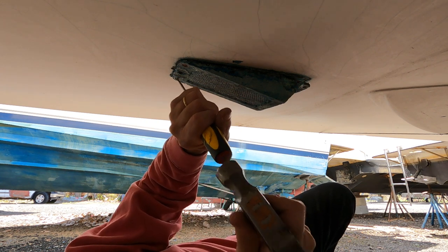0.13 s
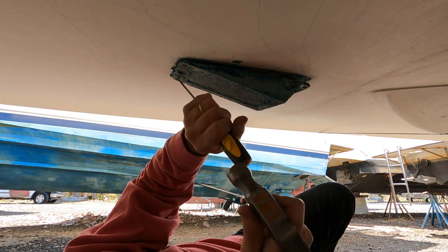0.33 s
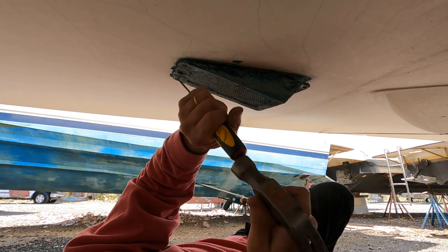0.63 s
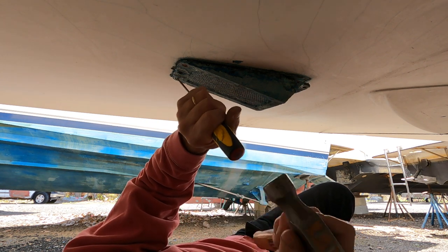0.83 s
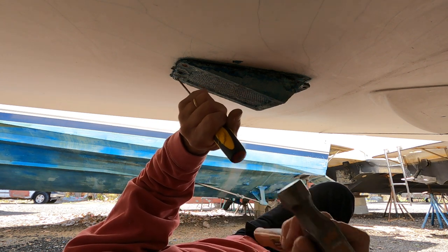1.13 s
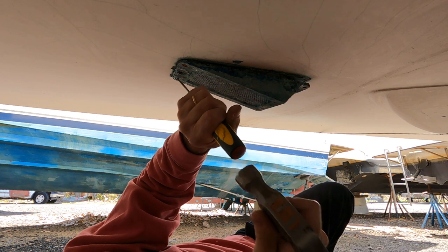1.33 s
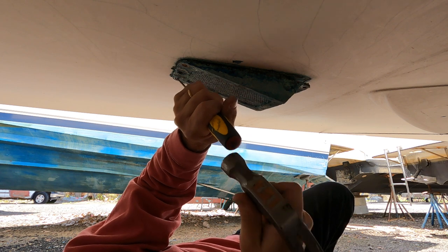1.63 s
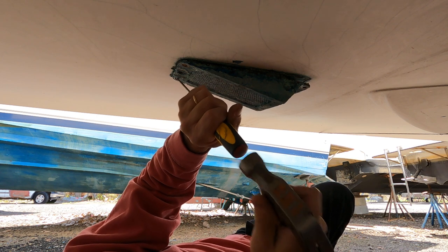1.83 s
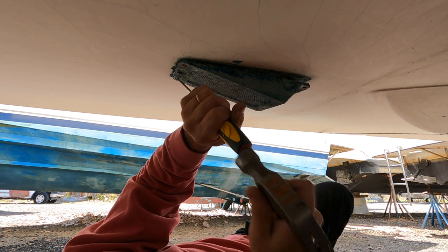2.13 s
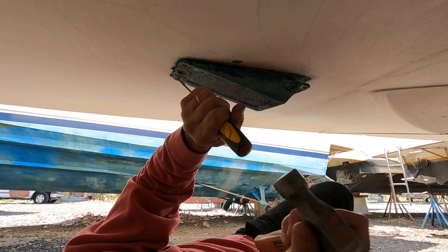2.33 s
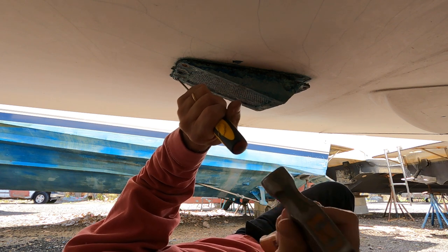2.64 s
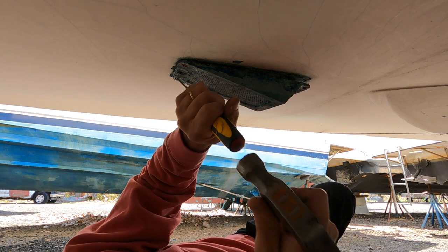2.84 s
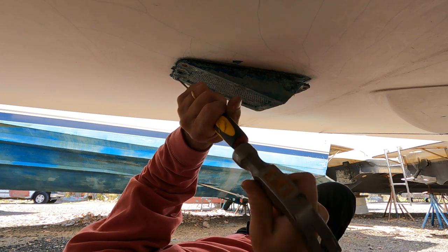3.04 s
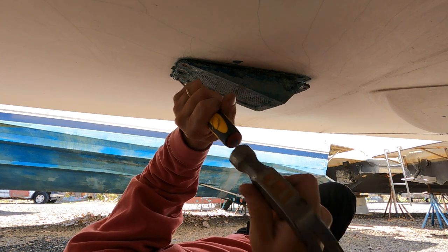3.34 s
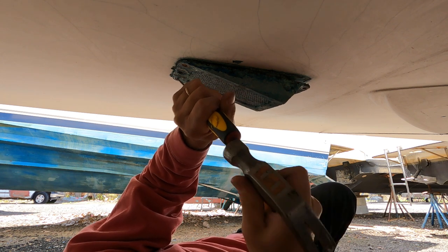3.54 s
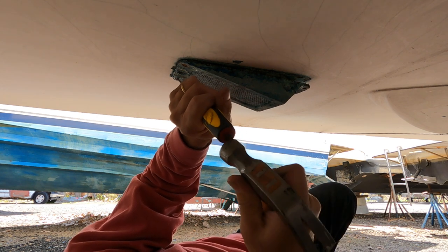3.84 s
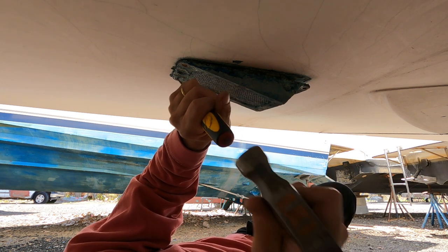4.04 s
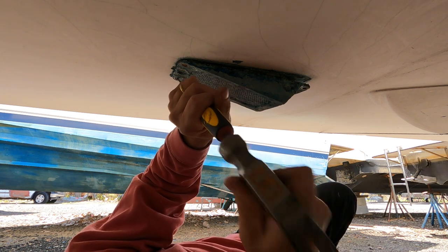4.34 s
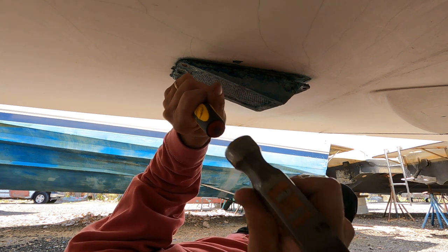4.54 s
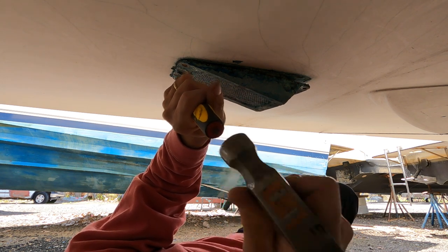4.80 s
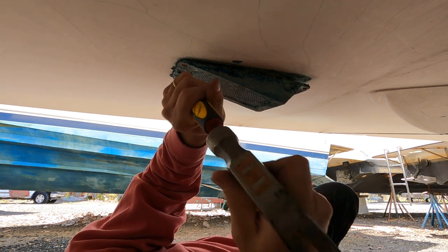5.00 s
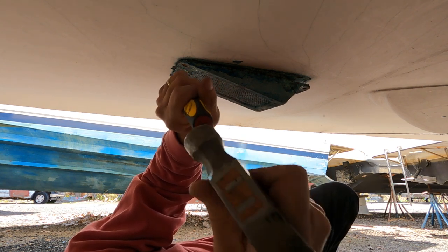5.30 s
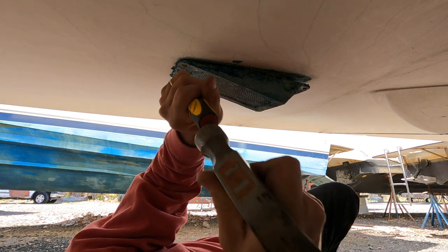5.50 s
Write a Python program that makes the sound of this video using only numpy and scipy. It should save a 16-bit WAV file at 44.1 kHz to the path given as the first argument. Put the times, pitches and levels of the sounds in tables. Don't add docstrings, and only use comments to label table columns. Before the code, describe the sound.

Close, even hammer taps on a tool handle, sharp and woody, resonating through hollow hull panels in a quiet outdoor yard.

```python
import sys
import numpy as np
from scipy import signal
from scipy.fft import rfft, irfft
from scipy.io import wavfile

SR = 44100
rng = np.random.default_rng(int(sys.argv[2]) if len(sys.argv) > 2 else 0)


def invert_db(x):
    u = np.asarray(x, float) / 20
    return 10 ** u


def wav_record(signal):
    frames = np.transpose(np.atleast_2d(signal))
    bounded = np.clip(frames, -1, 1)
    quanta = np.round(bounded * 32767).astype(np.int16)
    wavfile.write(sys.argv[1], SR, quanta)


N = 249779
LEAD = SR // 5
HULL_LAG_S = 0.00063

# (time [s], sharpness [dB], lower shaft ring [dB], upper shaft ring [dB], head beat null after blow [s])
BLOWS = [(-0.1342, -11, -74, -68.2, 0.11), (0.1547, -6, -69.5, -69.5, .01), (0.4361, -1.5, -83, -62, .004),
         (0.7443, -6.5, -64, -79, 0.021), (1.0393, -3.5, -64.5, -68.5, .16),
         (1.3496, 0.5, -68.5, -65.5, .17), (1.6785, -0.5, -66, -73.5, 0.0043), (1.9866, 0, -66, -62.5, 0.1),
         (2.279, 1.5, -61.5, -65, 0.11), (2.5723, 3, -72, -60.5, .115), (2.853, 1.3, -68, -69, 0.082),
         (3.119, 1.5, -79, -66, 0.075), (3.3874, 3, -71.5, -71.5, 0.081), (3.6594, 1.5, -79.5, -84, 0.093),
         (3.9455, 2, -69, -79, .12), (4.211, 3, -80, -74, 0.15), (4.4918, 3, -65.5, -70.5, .15),
         (4.755, 2.7, -66, -68, 0.15), (5.0155, 3.0, -62, -69, 0.14), (5.2785, 2.5, -59, -78, .18),
         (5.5225, 4, -60, -62, 0.18)]
# (frequency [Hz], level [dB], t60 [s], polarity [+-1], gain change per dB of sharpness [1/dB])
PANELS = [(56.0, -56.1, 0.409, 1, 0.01), (70.6, -66.8, 0.76, 1, 0.05), (114.6, -51.5, 0.845, 1, 0.01),
          (116.6, -44.3, 0.505, -1, 0.04), (123.7, -42.0, 0.352, -1, -0.01), (138.7, -28.2, 0.115, 1, 0.01),
          (147.2, -51.9, 0.845, -1, 0.01), (162.2, -54.0, 0.65, -1, 0.02), (171.4, -53.0, 0.492, -1, 0.07),
          (206.0, -43.9, 0.845, 1, 0.05), (206.2, -38.3, 0.599, -1, 0.04), (226.3, -32.8, 0.117, 1, 0.02),
          (234.5, -53.0, 0.494, -1, 0.02), (246.1, -50.1, 0.552, 1, 0.01), (263.3, -35.3, 0.228, 1, -0.01),
          (274.0, -50.4, 0.539, -1, 0.09), (282.3, -64.2, 0.827, -1, 0.17), (294.4, -15.5, 0.025, -1, -0.0),
          (302.2, -33.3, 0.192, -1, -0.0), (308.6, -35.0, 0.778, 1, -0.02),
          (308.7, -35.0, 0.845, -1, -0.02), (348.9, -25.4, 0.117, 1, 0.04), (376.4, -40.4, 0.259, 1, 0.02)]
# (frequency [Hz], level [dB], t60 [s], polarity [+-1], gain change per dB of sharpness [1/dB])
RIBS = [(418.7, -53.1, 0.367, 1, -0.03), (426.3, -23.3, 0.025, 1, -0.0), (463.8, -44.5, 0.159, -1, -0.02),
        (479.7, -64.3, 0.576, -1, 0.07), (505.8, -29.9, 0.023, 1, 0.0), (513.7, -51.7, 0.236, -1, 0.03),
        (550.5, -43.5, 0.192, -1, -0.02), (558.7, -59.1, 0.405, -1, -0.01), (564.8, -39.1, 0.066, 1, -0.0),
        (599.3, -45.7, 0.166, -1, 0.09), (609.7, -53.2, 0.225, -1, 0.05), (621.3, -65.6, 0.347, -1, 0.18),
        (642.0, -46.2, 0.073, -1, 0.17), (670.8, -59.4, 0.116, -1, 0.12), (685.7, -57.4, 0.213, -1, 0.1),
        (792.3, -60.4, 0.224, -1, 0.09), (811.6, -50.1, 0.129, -1, 0.06), (863.7, -54.7, 0.084, 1, 0.21),
        (910.9, -66.2, 0.313, -1, -0.01)]
# (frequency [Hz], early level [dB], early t60 [s], late level [dB], late t60 [s])
TAIL_BANDS = [(96, -57.5, 0.47, -69, 0.83), (133, -60, 0.23, -56, 0.94), (302.3, -50.5, 0.23, -57.5, 1),
              (370, -59, 0.14, -49, 0.45), (545, -63.5, 0.022, -62.5, .6), (647, -49.5, 0.033, -63.5, 0.6),
              (756, -42, 0.046, -65, 0.5), (970, -43, 0.045, -64, 0.11), (1096, -54, 0.033, -67, 0.42),
              (1698, -39, 0.027, -64, 0.35), (2400, -44.5, 0.041, -69.5, 0.49),
              (2730, -53, 0.038, -68, 0.3), (3600, -55, 0.032, -84, 0.36), (5300, -60, 0.022, -78, 0.3),
              (6900, -69, .014, -84, .16), (9500, -68.5, .008, -104, .06),
              (13770, -67.5, .003, -120, 0.046)]


def butter(order, hz, kind, x):
    return signal.sosfilt(signal.butter(order, hz, kind, fs=SR, output="sos"), x)


def highpass_zero_phase(x, hz, **padding):
    return signal.sosfiltfilt(signal.butter(2, hz, "high", fs=SR, output="sos"), x, **padding)


def band(x, hz, octaves, order=2):
    return butter(order, [hz * 2 ** (-octaves / 2), hz * 2 ** (octaves / 2)], "band", x)


def fade(t, t60):
    return (t >= 0) * np.exp(-np.log(1000) * np.maximum(t, 0) / t60)


def unit(x):
    return x / np.sqrt(np.mean(x ** 2))


def modes(t, hz, db, t60, sign):
    rings = fade(t[:, None], t60) * np.sin(2 * np.pi * hz * t[:, None])
    return rings @ (sign * invert_db(db))


def add(out, start_s, sound):
    i = int(round(start_s * SR)) + LEAD
    out[i:i + len(sound)] += sound[:len(out) - i]


def clack(t, sharp_db, detune):
    # (frequency [Hz], level [dB], t60 [s], polarity [+-1], share of sharpness [dB/dB])
    tool = [(2309, -26.5, 0.014, -1, 0.6), (2787, -29, 0.014, 1, 0.24), (4274, -46, 0.016, 1, 0.84),
            (4743, -38.5, 0.0081, -1, 0.49), (5930, -37.5, 0.0053, 1, 1)]
    # (frequency [Hz], level [dB], t60 [s], polarity [+-1], share of sharpness [dB/dB])
    fitting = [(1122, -31, 0.0057, -1, 1.36), (1490, -21.5, 0.0047, -1, 0.43), (1927, -42, 0.04, 1, 0.4),
               (2040, -20.5, 0.0061, -1, -0.5), (2687, -41.5, 0.021, -1, 2.8), (3263, -36.5, 0.0095, -1, 3),
               (5330, -40, 0.0059, -1, 1.45)]
    # (frequency [Hz], level [dB], t60 [s], polarity [+-1], share of sharpness [dB/dB])
    seat = [(644, -41, 0.046, -1, 0.092), (796, -45, 0.029, -1, 0.08)]
    out = 0
    for table, lag_s in ((tool, -0.00103), (fitting, -0.00012), (seat, HULL_LAG_S)):
        hz, db, t60, sign, share = np.transpose(table)
        detuned_hz = hz * (1 + 0.024 * detune[:len(hz)])
        out = out + modes(t - lag_s, detuned_hz, db + share * sharp_db, t60, np.sign(sign))
    return out


def shaft(t, lower_db, upper_db, luck):
    hz = np.array([4371, 4497 * (1 + 0.002 * luck)])
    return modes(t, hz, np.array([lower_db, upper_db]) + 5.5, 0.115, 0.93)


def hull(t, weight):
    hz, db, t60, sign, _ = np.transpose(PANELS + RIBS)
    gain = sign * weight
    deep = hz < 100

    def ring(k):
        return modes(t - HULL_LAG_S, hz[k], db[k], t60[k], gain[k])

    panels = highpass_zero_phase(ring(~deep), 66)
    keel_rise_s = 0.01
    return panels + ring(deep) * (1 - np.exp(-t / keel_rise_s))


def tails():
    t = np.arange(SR // 2) / SR
    rise = 1 - np.exp(-t / 0.00095)
    echo_s, echo_spread_s, echo_db = 0.06, 0.0091, -8.5
    wall = 1 + invert_db(echo_db) * np.exp(-((t - echo_s) / echo_spread_s) ** 2)
    clumps = invert_db(1.3 * unit(band(rng.standard_normal(len(t)), 100, 1.9)))

    def response(hz, early_db, early_t60, late_db, late_t60):
        noise = unit(band(rng.standard_normal(len(t)) * clumps, hz, 0.44, order=4))
        early = invert_db(early_db) * fade(t, early_t60)
        late = invert_db(late_db) * wall * fade(t, late_t60)
        return noise * rise * (early + late)

    return np.array([[response(*row) for row in TAIL_BANDS] for _ in range(3)])


def blows():
    out, t = np.zeros(N + LEAD), np.arange(SR // 2) / SR
    pre_s = 0.002
    clack_t = np.arange(SR // 5) / SR - pre_s
    boom = hull(t, 0.97)
    shift = hull(t, np.array(PANELS + RIBS)[:, -1])
    same, vary_a, vary_b = tails()
    reach = np.clip(np.log2(np.array(TAIL_BANDS)[:, 0] / 1800), 0, 1) * 0.28
    fresh = np.clip(0.69 + reach, 0, 1.5)[:, None]
    chance = rng.standard_normal((len(BLOWS), 10))
    for (s, sharp_db, lower_db, upper_db, _), luck in zip(BLOWS, chance):
        thump_db = -0.0564 * sharp_db
        add(out, s - pre_s, clack(clack_t, sharp_db, luck))
        add(out, s, shaft(t, lower_db, upper_db, luck[-2]))
        add(out, s, (boom + np.clip(sharp_db, -5, 5) * shift) * invert_db(thump_db + 0.46))
        angle = 10 * luck[-1]
        tail = same + fresh * (np.cos(angle) * vary_a + np.sin(angle) * vary_b)
        add(out, s, invert_db(thump_db + reach * sharp_db) @ tail)
    return out


def head():
    # (time [s], head ring mid-swing [dB], swell [dB/s], beat rate [Hz])
    grip = [(-.13, -79.5, -81.5, 5.1), (.15, -88, -60.5, 5), (.44, -76.5, -46, 3.1), (.75, -85, -41.5, 5.9),
            (1.999, -77, -25, 5.5), (2.899, -76.5, 39, 5.4), (3.7, -79.5, -19.5, 6.6),
            (4.501, -77, -39.5, 7.1), (5.5, -79.5, -74, 6.6)]
    ring_hz, mid_swing_s = 5931, 0.13
    out = np.zeros(N + LEAD)
    ends = [row[0] for row in BLOWS[1:]] + [N / SR + 0.5]
    when, mid_db, swell_db, beat_hz = np.transpose(grip)
    for (s, *_, null_s), end in zip(BLOWS, ends):
        u = np.arange(int((end - s - 0.008) * SR)) / SR
        edges = np.clip(np.minimum(u, u[-1] - u) / 0.036, 0, 1)
        beat = np.sin(np.pi * np.interp(s, when, beat_hz) * (u - null_s))
        db = np.interp(s, when, mid_db) + np.interp(s, when, swell_db) * (u - mid_swing_s)
        add(out, s, invert_db(db) * edges * beat * np.sin(2 * np.pi * ring_hz * (u + s)))
    return out


def grit():
    # (time [s], peak level [dB], brightness [dB])
    ticks = [(0.51, -63.5, -25), (0.5224, -69, -28), (1.544, -87, -27), (2.445, -64.5, -11),
             (2.529, -78, -20), (2.537, -72, -16), (2.6968, -70.5, -21), (2.7551, -72, -20),
             (2.771, -63.5, -29), (3.5338, -62, -8), (3.8044, -80, -17), (3.8306, -78, -10),
             (3.875, -86, -16), (4.1264, -83, -20), (4.4498, -73, -4), (4.6154, -70, -11),
             (4.6694, -76, -20), (4.9487, -72.5, -10), (5.152, -71, -9), (5.2345, -78, -5)]
    out, t = np.zeros(N + LEAD), np.arange(SR // 20) / SR
    envelope = fade(t, 0.013) * (1 - np.exp(-t / 0.00044))
    chance = rng.standard_normal((len(ticks), 2, len(t)))
    for (s, db, bright_db), (dull, bright) in zip(ticks, chance):
        puff = unit(band(dull, 2800, 2.4)) + invert_db(bright_db + 6) * unit(band(bright, 11000, 0.9))
        add(out, s, invert_db(db + 4.5) * puff * envelope)
    return out


def yard():
    # (frequency [Hz], density [dB per Hz])
    air_spectrum = [(24, -31), (40, -6), (290, -3), (800, -29.5), (5180, -46), (6020, -34), (6650, -60.5),
                    (16000, -51.5)]
    # (time [s], level [dB])
    rustle_level = [
        (0, -87.5),
        (.12, -100),
        (.2, -100),
        (.27, -95),
        (.4, -89),
        (.45, -110),
        (5.7, -115),
    ]
    f = np.maximum(np.arange(N // 2 + 1) * SR / N, 1)
    hz, db = np.transpose(air_spectrum)
    shape = invert_db(np.interp(np.log(f), np.log(hz), db))
    air = irfft(rfft(rng.standard_normal(N)) * shape, N)
    rustle_gain = invert_db(np.interp(np.arange(N) / SR, *np.transpose(rustle_level)))
    rustle = unit(band(rng.standard_normal(N), 4050, 0.11)) * rustle_gain
    return invert_db(-68) * unit(air) + rustle


def scene():
    return ((blows() + head() + grit())[LEAD:] + yard())[None]


def band_limit(x):
    return signal.sosfilt(signal.butter(12, 16500, fs=SR, output="sos"), x)


def record(dry):
    # (offset [frames], level [dB])
    smear = [(-1, -25), (-2, -37), (-3, -56), (1, -40)]
    frame_s = 512 / 48000
    heard = butter(2, 6296, "low", butter(3, 45, "high", dry))
    pad = SR // 10
    dull = np.pad(butter(2, (190, 4500), "band", heard), ((0, 0), (pad, pad)))
    ghosts = 0
    for frames, db in smear:
        ghosts = ghosts + invert_db(db - 3.5) * np.roll(dull, int(round(frames) * frame_s * SR), axis=1)
    t = np.arange(SR // 20) / SR
    blur = band(rng.standard_normal(len(t)), 2000, 6.2) * fade(t, 0.024)
    ghosts = ghosts + invert_db(-15.0) * signal.fftconvolve(ghosts, blur[None])[:, :N + 2 * pad]
    wet = heard + ghosts[:, pad:-pad]
    ceiling, knee = 0.13, 4.6
    held = wet / (1 + np.abs(wet / ceiling) ** knee) ** (1 / knee)
    held = highpass_zero_phase(held, 40, padtype="even", padlen=SR // 10)
    return band_limit(held)


dry = scene()
out = record(dry)
wav_record(out)
```